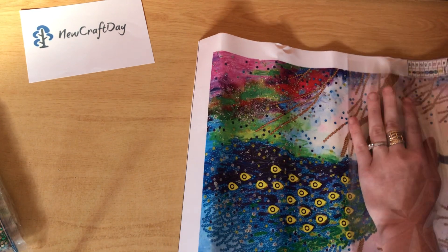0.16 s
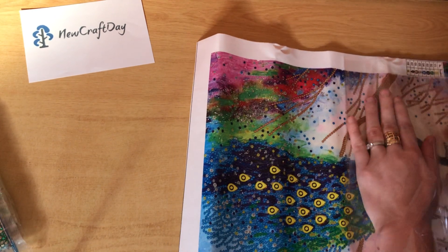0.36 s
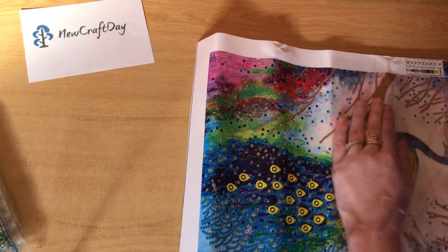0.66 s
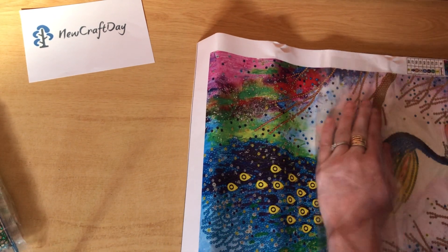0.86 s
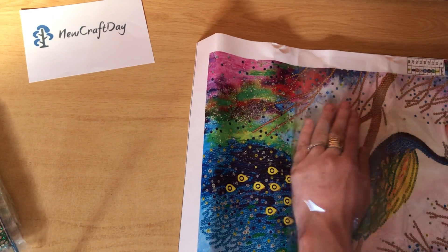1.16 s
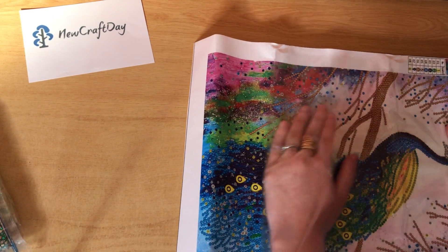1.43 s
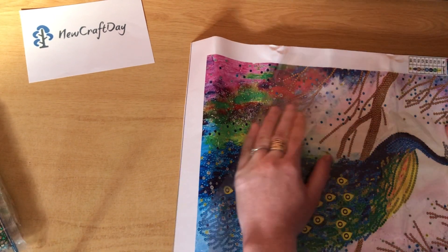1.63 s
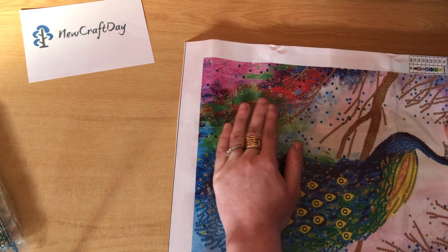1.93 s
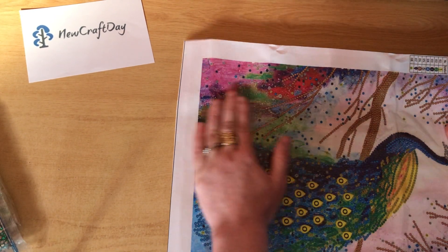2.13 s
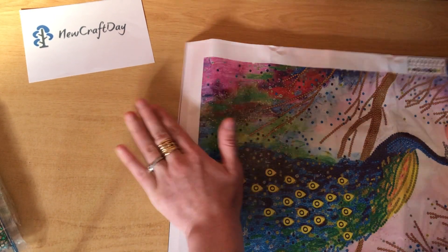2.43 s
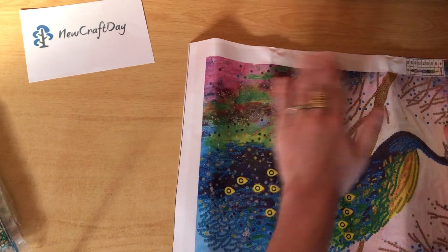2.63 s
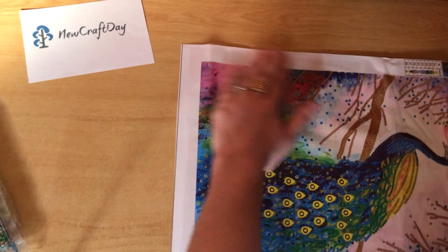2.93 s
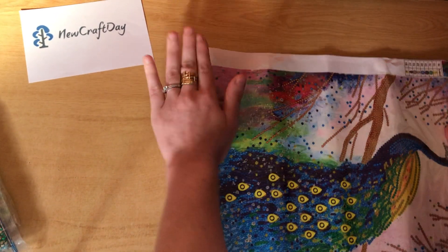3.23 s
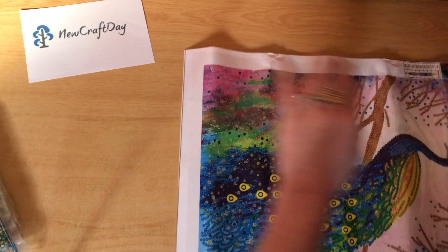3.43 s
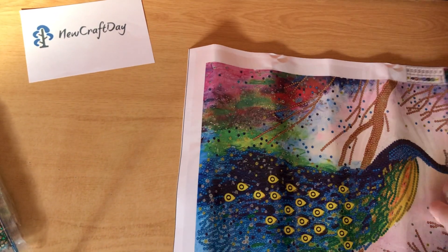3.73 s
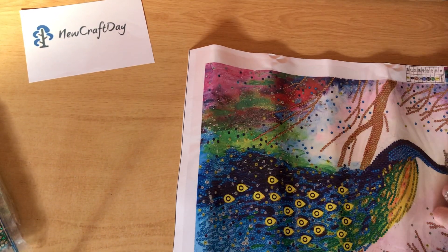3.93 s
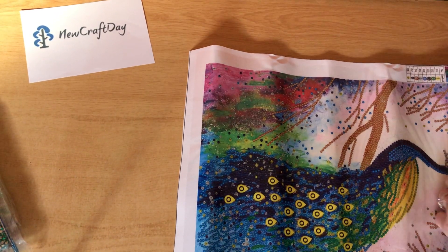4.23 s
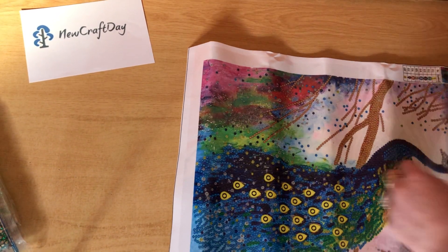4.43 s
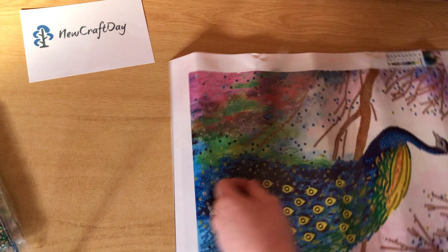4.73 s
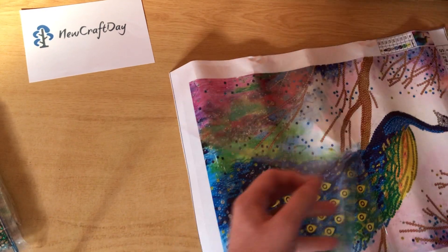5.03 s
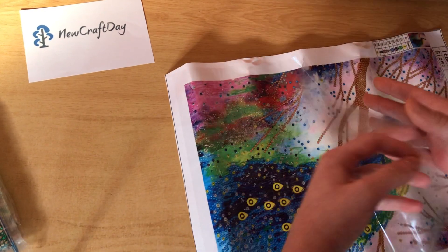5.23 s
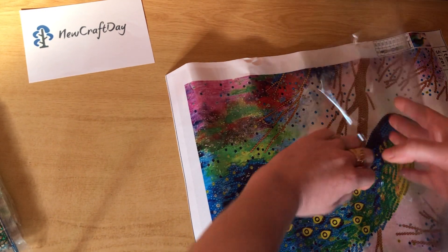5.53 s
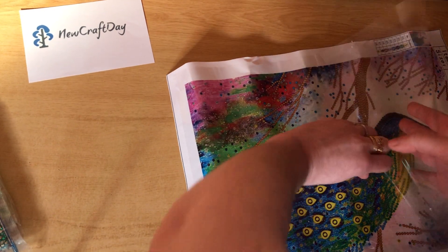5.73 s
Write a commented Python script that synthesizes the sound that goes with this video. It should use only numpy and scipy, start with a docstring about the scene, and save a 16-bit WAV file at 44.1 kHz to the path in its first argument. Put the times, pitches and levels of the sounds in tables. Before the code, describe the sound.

A thin plastic film crackles close by as hands smooth it over a canvas on a wooden table. From the start to about 1.9 seconds, swishing strokes carry many sharp, bright snaps, strongest around 0.9 and 1.7 seconds, with a soft palm bump near 1 second. From 2 seconds it is quieter: faint sliding, brief rubs of skin on plastic and scattered ticks. A dull palm thump sounds on the table at about 2.8 seconds, followed by a low rubbing slide and lighter bumps with crackles near 3.4 and 3.8 seconds. At about 4.4 seconds the film is lifted in the loudest, densest shower of crinkling, lasting until about 4.9. More crackling comes between 5 and 5.6 seconds, with a light knock near 5.3, then it thins out. The room is small, with a faint steady rumble and hiss.

```python
"""A thin plastic film crackles as hands smooth it over a canvas on a wooden table, then lift it.
Its creases buckle and snap over, singly and in showers, above the hiss of sliding and the canvas's drag.
Skin slips on the film in narrow-band rubs; a palm slides, lands and thumps, driving the table's modes.
A small room reverberates over a quiet rumble and hiss."""
import sys
import numpy as np
from scipy import signal
from scipy.fft import rfft, irfft, next_fast_len
from scipy.io import wavfile
from scipy.ndimage import uniform_filter1d, map_coordinates

SR = 44100
rng = np.random.default_rng(int(sys.argv[2]) if len(sys.argv) > 2 else 0)


def unload_wav(signal):
    """Save mono or channel-first audio to the path in sys.argv[1] as 16-bit WAV at rate SR, clipped to [-1, 1]."""
    wavfile.write(
        sys.argv[1],
        SR,
        np.round(np.clip(np.atleast_2d(signal).T, -1, 1) * 32767).astype(np.int16),
    )


N = 258850

# Strength of the film's rustle under the hand: time_s, body_db
RUSTLE_LEVEL = [(0, -56), (.2, -53), (.38, -43), (.53, -53), (.63, -44), (.78, -52.5), (.95, -45.5),
                (1.1, -54.5), (1.33, -56.5), (1.52, -44), (1.63, -49), (1.74, -39.5), (1.92, -56),
                (2.07, -66.5), (2.17, -58.5), (2.34, -70), (2.5, -56), (2.76, -74.5), (2.87, -55),
                (3.15, -58), (3.33, -65.5), (3.44, -49), (3.51, -52.5), (3.55, -59.5), (3.7, -71),
                (3.8, -61.5), (3.98, -68.5), (4.24, -55.5), (4.34, -58), (4.52, -34.5), (4.69, -40.5),
                (4.72, -33.5), (4.8, -38), (4.88, -46.5), (5.13, -54), (5.23, -40), (5.5, -50.5),
                (5.6, -41.5), (5.74, -57), (5.87, -61.5)]
# Slow drift of the rustle's colour: time_s, treble_over_body_db, canvas_drag_db
RUSTLE_COLOUR = [(0, -18, -57), (.5, -13, -63), (.9, -6, -77), (1.1, -7, -57), (1.45, -2, -62.5),
                 (1.76, -10.5, -53.5), (2.1, -1, -63.5), (2.35, 1, -66.5), (2.9, 0.5, -63.5),
                 (3.35, -2, -66), (3.75, -1, -62.5), (4.3, -1.5, -68.5), (4.48, 0, -47.5),
                 (4.75, -1.5, -62.5), (5.05, -9, -60), (5.3, -5.5, -55), (5.7, -27, -60.5),
                 (5.87, -10, -61)]
# The hand's weight landing on the table: start_s, peak_db, hardness (0 to 1)
PALM_THUMPS = [(0.341, -55, 0.5), (0.639, -66, 0.15), (0.977, -42.5, 0.2), (1.166, -56, 0.8),
               (1.685, -49, 0.3), (2.788, -30, 0.29), (3.436, -41.5, 0.55), (3.467, -46.5, 0.3),
               (3.793, -41, 0.65), (4.432, -42, 0.8), (5.278, -41, 0.7)]


def amp(db):
    """Amplitude ratio of a level in decibels."""
    return 10 ** (np.asarray(db) / 20)


def unit(x):
    """The signal normalised to rms 1."""
    return x / np.sqrt(np.mean(x ** 2) + 1e-20)


def along(points, hz):
    """Interpolation of (frequency_hz, value) points on a logarithmic frequency axis."""
    knot_hz, values = np.transpose(points)
    return np.interp(np.log(hz + 1), np.log(knot_hz + 1), values)


def curves(rows):
    """Piecewise linear envelopes, one for each column after time_s."""
    time_s, *columns = np.transpose(rows)
    return [np.interp(np.arange(N) / SR, time_s, column) for column in columns]


def wobble(knots_per_s):
    """Smooth random modulation: a spline through Gaussian values."""
    knots = rng.standard_normal(int(N * knots_per_s / SR) + 4)
    return map_coordinates(knots, [np.arange(N) * knots_per_s / SR])


def filtered(x, response):
    """Linear filtering: the spectrum is multiplied by a frequency response."""
    size = 2 * next_fast_len(N // 2 + SR // 4)
    return irfft(rfft(x, size) * response(np.fft.rfftfreq(size, 1 / SR)), size)[..., :N]


def minimum_phase(points, hz):
    """Folding the cepstrum gives a (frequency_hz, level_db) spectrum a causal response of mean power 1."""
    cepstrum = irfft(np.log(amp(along(points, hz)) + 1e-6))
    half = len(cepstrum) // 2
    cepstrum[1:half] *= 2
    cepstrum[half + 1:] = 0
    gain = np.exp(rfft(cepstrum))
    return gain / np.sqrt(np.mean(np.abs(gain) ** 2))


def film_bands(hz):
    """The film's radiation spectrum, divided by a crossover into body and treble, each of mean power 1."""
    # Spectral density of the film's sound: frequency_hz, level_db
    film_spectrum = [(410, -25.5), (700, -20), (1150, -13), (1900, -11), (3900, -5.5), (6100, -4),
                     (9000, -2.5), (12500, -4.5), (16000, -6)]
    crossover_hz = 6000
    lowpass = 1 / (1 + (hz / crossover_hz) ** 4)
    bands = minimum_phase(film_spectrum, hz) * [lowpass, 1 - lowpass]
    return bands / np.sqrt(np.mean(np.abs(bands) ** 2, axis=1, keepdims=True))


def shower(cracks_per_s, spread_db, life_s):
    """Shot noise: tiny cracks of unequal size arrive at random, their energy decaying exponentially."""
    arrivals = rng.random(N) < cracks_per_s / SR
    sizes = amp(spread_db * np.minimum(rng.exponential(size=N), 2.5))
    energy = signal.lfilter([1], [1, -np.exp(-1 / (life_s * SR))], (arrivals * sizes) ** 2)
    return np.sqrt(energy / cracks_per_s) * rng.standard_normal(N)


def film_rustle():
    """Small creases buckle in clumps over the smooth hiss of sliding friction."""
    body_db, = curves(RUSTLE_LEVEL)
    treble_db, _ = curves(RUSTLE_COLOUR)
    clumps = amp(1.8 * wobble(45))
    cracks_per_s = np.clip(500 * amp(1.3 * (body_db + 52.5)), 150, 4000)  # louder strokes are denser
    crackle = unit(clumps * shower(cracks_per_s, spread_db=2.5, life_s=0.001))
    hiss = 0.89 * rng.standard_normal(N)
    body, treble = filtered(crackle + hiss, film_bands)
    body = filtered(body, lambda hz: (1j * hz / (1j * hz + 1200)) ** 2)  # tiny creases radiate little bass
    return amp(body_db) * unit(body) + amp(body_db + treble_db) * unit(treble)


def canvas_drag():
    """Friction of the dragging canvas makes uneven mid-band noise."""
    # Spectral density of the drag: frequency_hz, level_db
    canvas_spectrum = [(200, -15.5), (400, -8.5), (700, -7.5), (1100, -3), (1700, -4), (2500, -6),
                       (5000, -47)]
    _, drag_db = curves(RUSTLE_COLOUR)
    friction = amp(2.5 * wobble(40)) * rng.standard_normal(N)
    return amp(drag_db) * unit(filtered(friction, lambda hz: minimum_phase(canvas_spectrum, hz)))


def skin_rubs():
    """Uneven frictional slips, about a hundred a second, drive one resonance for each rub."""
    # Skin slipping on the film: start_s, length_s, pitch_hz, width_hz, level_db
    rubs = [(0, 0.055, 517, 120, -62.5), (2.019, 0.044, 1100, 90, -60), (2.195, 0.068, 1020, 250, -59),
            (4.211, .02, 1190, 300, -48.5), (0.357, 0.029, 1140, 200, -60), (2.407, 0.032, 620, 400, -52.5),
            (2.78, 0.009, 2060, 1510, -35.5), (2.467, 0.038, 1730, 900, -50),
            (2.882, 0.061, 1570, 650, -52.5), (2.955, 0.17, 1800, 500, -60), (3.006, 0.095, 790, 220, -63),
            (3.552, 0.23, 374, 40, -63)]
    out = np.zeros(N + SR)
    for start_s, length_s, pitch_hz, width_hz, level_db in rubs:
        n = round(length_s * SR)
        slips = amp(3.5 * wobble(200)[:n]) * rng.standard_normal(N)[:n]
        b, a = signal.iirpeak(pitch_hz, pitch_hz / width_hz, SR)
        rub = signal.lfilter(b, a, signal.lfilter(b, a, slips))  # two passes narrow the band further
        out[round(start_s * SR):][:n] += amp(level_db) * np.sqrt(np.hanning(n)) * unit(rub)
    return out[:N]


def table_response(hz):
    """Modal superposition: the table top responds as damped resonators of alternating sign."""
    # Modes of the wooden top: pitch_hz, width_hz, level_db
    modes = [(68, 24.3, -3), (160.4, 11, 0), (213.5, 21.5, -5.5), (279, 33, -5), (370, 48, -7),
             (584, 64, -11.5), (690, 51, -9.5), (910, 116, -15)]
    return sum((-1) ** k * amp(db) * 1j * hz * width / (pitch ** 2 - hz ** 2 + 1j * hz * width)
               for k, (pitch, width, db) in enumerate(modes))


def table_shudder():
    """Forced vibration of the top: the powers fed in by resting, sliding and settling hands add."""
    # The palm pressing along the table: start_s, length_s, deep_db, board_db
    slides = [(.55, 0.26, -62, -85), (1.074, 0.19, -75, -56), (1.605, 0.29, -66, -61),
              (2.23, .42, -60.5, -63.5), (2.79, 0.37, -54.5, -73), (4.38, 0.26, -64, -58)]
    rest_deep_db, rest_board_db = -68, -67.5
    settle_db, settle_s = -14, 0.04  # after a thump: level relative to its peak, decay time
    power = np.outer(amp([rest_deep_db, rest_board_db]) ** 2, np.ones(N + SR))
    for start_s, length_s, deep_db, board_db in slides:
        n = round(length_s * SR)
        power[:, round(start_s * SR):][:, :n] += np.outer(amp([deep_db, board_db]) ** 2, np.hanning(n))
    settling = np.exp(-np.arange(SR // 2) / (settle_s * SR))
    for start_s, peak_db, _ in PALM_THUMPS:
        power[1, round(start_s * SR):][:len(settling)] += (amp(peak_db + settle_db) * settling) ** 2
    deep_gain, board_gain = np.sqrt(power[:, :N])
    vibration = filtered(rng.standard_normal(N), table_response)
    deep = filtered(vibration, lambda hz: 1 / (1 + (hz / 115) ** 6))
    return deep_gain * unit(deep) + board_gain * unit(vibration - deep)


def ambient_noise():
    """Stationary coloured noise: a quiet rumble and a faint high hiss."""
    # Spectral density of the background: frequency_hz, level_db
    air_spectrum = [(20, 17.5), (70, -10), (160, -2), (400, -14.5), (1000, -43), (2000, -22), (8000, -72),
                    (16000, -23)]
    return amp(-62.5) * unit(filtered(rng.standard_normal(N), lambda hz: amp(along(air_spectrum, hz))))


def lesser_snap_rows(count):
    """Lesser creases buckle at random times, scattered log-normally above the rustle's level and colour."""
    position = rng.random(count)
    size, tone, life = rng.standard_normal((count, 3)).T
    start_s = position * (N - 1) / SR
    at_start = lambda rows: np.interp(start_s, *np.transpose(rows)[:2])
    peak_db = at_start(RUSTLE_LEVEL) + 2.5 + 6 * size
    treble_db = at_start(RUSTLE_COLOUR) + 10 + 4 * tone
    life_ms = 1.8 * np.exp(0.35 * life)
    return np.c_[start_s, peak_db, treble_db, life_ms]


def crease_snaps():
    """Snap-through buckling: a crease flips in a run of cracks that builds and dies in milliseconds."""
    # The loudest creases snapping over: start_s, peak_db, treble_over_body_db, life_ms
    loud_snaps = [(0.0323, -39.5, -5, 6.5), (0.169, -39.5, -23, 4.7), (0.21, -31, -5, 7.5),
                  (0.2593, -38, -12, 1.8), (0.3047, -39, -5, 5), (0.3483, -25, -3, 2.7),
                  (0.3737, -30, -4, 13), (0.5163, -36.5, -13, 1.2), (0.5522, -27.5, -2, 1.5),
                  (0.5966, -24.5, 0, 0.68), (0.6076, -30.5, -2, 1.7), (0.6294, -24, -2.5, 1.8),
                  (0.6694, -33.5, 0, 1.7), (0.7514, -27.5, 1.5, 2), (0.7743, -23.5, 15, 1),
                  (0.806, -30, 6, 1.5), (0.8139, -37, 10, 1.4), (0.8301, -26.5, 6, 3),
                  (0.8436, -38, 9, 0.6), (0.8534, -30.5, 1, 1.7), (0.868, -19, 10, 1.8),
                  (0.8925, -31.5, 5, 3.0), (0.9374, -18, 10.5, 3.5), (0.9668, -29.5, 5, 2.4),
                  (1.0102, -33.5, -7, 2.5), (1.0217, -31.5, -10, 4.4), (1.0371, -37, 8, 0.47),
                  (1.0732, -26, 5, 1.5), (1.2332, -31.5, 4.5, 2.6), (1.2894, -41, -2, 3.3),
                  (1.3454, -24, 10, 2.35), (1.3715, -37, -1, 1.3), (1.4138, -36.5, 2, 2.3),
                  (1.4391, -29, 1, 0.4), (1.4648, -24.5, 9.5, 3.1), (1.4806, -28.5, -2, 2.3),
                  (1.4906, -28, 6, 1.4), (1.511, -27, -1, 1.8), (1.5443, -26.5, 5, 3.4),
                  (1.5961, -26, 7, 1.1), (1.6083, -33, -6, 3.6), (1.6982, -21.5, 6, 1.5),
                  (1.7228, -20.5, 11.5, 2.1), (1.745, -16, 16, 0.9), (1.7664, -26.5, 2, 1.74),
                  (1.7995, -27, 7, 0.69), (1.8338, -33, 2, 0.78), (1.888, -46, 8, 2.2),
                  (1.9107, -41, 16, 0.78), (2.1139, -48, 5, 2), (2.1393, -40.5, 18, 1.1),
                  (2.1667, -47, 7, 1.2), (2.203, -44, 4, 1.6), (2.213, -40.5, 6, 0.93),
                  (2.2524, -49.5, 4, 1.1), (2.345, -50, 5, 1.8), (2.418, -47, 6, 2.4),
                  (2.4673, -32.5, 5.5, 0.9), (2.481, -39, 11, 1), (2.5214, -44, 12, 2.5),
                  (2.554, -44, -4, 2), (2.603, -41, -1, 0.97), (2.7833, -35.5, 21, 6.3),
                  (2.7878, -31, -29, 1.3), (2.811, -40, -4, 1.6), (3.1377, -43, -2, 0.9),
                  (3.2178, -42.5, -11, 1.2), (3.283, -48.5, -8, 3.6), (3.3551, -36.5, 4.5, 1.1),
                  (3.3693, -38, 12, 0.51), (3.44, -34.5, 2, 1.2), (3.4535, -27, 5, 0.47),
                  (3.4858, -29, 9, 1.8), (3.5625, -51, -15, 1.5), (3.6685, -48.5, 6, 1.9),
                  (3.758, -46.5, -7, 2.8), (3.7821, -36.5, -4, 1.2), (3.789, -37.5, 8, 2.1),
                  (3.9316, -52, -1, 0.95), (4.0465, -27.5, 10, 0.72), (4.0944, -42, 6, 1.1),
                  (4.1352, -40, 8, 4.5), (4.2054, -42, -3, 1.5), (4.2207, -30.5, -0.5, 2.6),
                  (4.2805, -43, 12, 1.3), (4.3037, -42.5, 1, 1.9), (4.33, -36, -3, 2.7),
                  (4.3463, -37.5, -4, 2.3), (4.379, -38, 9, 1.3), (4.391, -32, 3, 1.3),
                  (4.41, -32.5, -2, 6.4), (4.4314, -23.5, -6, 1.63), (4.4388, -22.5, 7, 1.2),
                  (4.4505, -26.5, 5, 1.9), (4.4662, -20, 6.5, 0.73), (4.4748, -27, 8, 0.88),
                  (4.4838, -27, 2, 0.8), (4.505, -21, 21, 2.2), (4.5146, -21.5, 3.5, 0.57),
                  (4.7049, -18.5, 2, 0.58), (4.8917, -38, 5, 2.1), (4.9094, -36, -3, 0.7),
                  (4.9418, -34.5, -1, 1.3), (4.9923, -25.5, 5.5, 1.75), (5.0091, -30, 6, 1),
                  (5.0623, -37.5, -10, 1.5), (5.0824, -45, 8, 2), (5.1443, -25.5, 4, 5.1),
                  (5.1818, -30, -3, 0.3), (5.2001, -26.5, 1, 4.1), (5.2164, -26, -1, 2.7),
                  (5.2395, -32.5, -2, 2), (5.2655, -38, 9, 3.0), (5.2816, -23, 1.5, 4.2),
                  (5.3039, -28, -3, 4.1), (5.3493, -33, 2, 2.8), (5.4342, -37, -9, 5.8),
                  (5.4877, -38.5, 16, 1.8), (5.516, -46, 10, 1.5), (5.53, -30.5, 7, 1.4),
                  (5.5404, -32.5, -1.5, 7.5), (5.6614, -46, 6, 1.5), (5.6792, -39, -1, 1.6),
                  (5.717, -34.5, -10, 0.91)]
    start_s, peak_db, treble_db, life_ms = np.r_[loud_snaps, lesser_snap_rows(count=70)].T
    t = np.arange(1536) / SR
    life_s = np.clip(life_ms, 0.3, 8)[:, None] / 1000
    noise = rng.standard_normal((len(start_s), 2, len(t)))
    spike_db = 3.9 * np.sqrt(5) * uniform_filter1d(noise[:, 1], size=5, axis=1)
    attack = 1 - np.exp(-t / (0.16 * life_s))
    decay = np.exp(-(t / (1.34 * life_s)) ** 1.08) + 0.092 * np.exp(-t / 0.044)
    runs = noise[:, 0] * amp(spike_db) * attack * decay
    runs /= np.sqrt(uniform_filter1d(runs ** 2, size=44, axis=1).max(1, keepdims=True))  # loudest 1 ms
    samples = (np.round(start_s * SR).astype(int)[:, None] + np.arange(len(t))).ravel()
    place = lambda gain: np.bincount(samples, (runs * gain[:, None]).ravel(), N + len(t))[:N]
    body_gain = amp(peak_db) / np.sqrt(1 + amp(2 * treble_db))  # body and treble share the peak power
    body, treble = filtered(np.array([place(body_gain), place(body_gain * amp(treble_db))]), film_bands)
    return body + treble


def palm_thumps():
    """Impact excitation: a force pulse rings the table's modes; harder contact makes a shorter pulse."""
    softest_contact_s, edge_db = 0.0067, 23.5
    out = np.zeros(N + SR)
    impulse_response = filtered(signal.unit_impulse(N), table_response)[:SR // 2]
    for start_s, peak_db, hardness in PALM_THUMPS:
        force = np.hanning(round(SR * softest_contact_s / (1 + 4 * hardness)) + 3)
        force[0] = amp(edge_db)  # the sharp first touch stands above the pulse's crest
        thump = signal.fftconvolve(impulse_response, force)
        out[round(start_s * SR):][:len(thump)] += amp(peak_db) * thump / np.abs(thump).max()
    return out[:N]


def reverberation(x):
    """A diffuse field: each frequency decays at its own rate, with a fresh noise tail every quarter second."""
    # Reverberation time of the small room: frequency_hz, t60_s
    decay_times = [(150, 0.11), (1300, 0.37), (4000, 0.096), (9000, 0.06), (16000, 0.02)]
    hop, delay_samples = SR // 4, 130
    out = np.zeros(N + 2 * SR)
    for start in range(0, N, hop):
        hz, t, spectrum = signal.stft(rng.standard_normal(SR // 2), SR, nperseg=256)
        decay = amp(-60 * t / along(decay_times, hz)[:, None])
        _, tail = signal.istft(spectrum * decay, SR, nperseg=256)
        wet = signal.fftconvolve(x[start:start + hop], tail / np.linalg.norm(tail))
        out[start + delay_samples:][:len(wet)] += wet
    return out[:N]


def scene():
    """Superposition of all sources; only the snaps and thumps excite the room."""
    transients = crease_snaps() + palm_thumps()
    sustained = table_shudder() + ambient_noise() + film_rustle() + canvas_drag() + skin_rubs()
    return (transients + sustained + amp(-11) * reverberation(transients))[None]


def record(dry):
    """Band limiting: the sound loses its deepest bass, has a few narrow dips and ends steeply near 16 kHz."""
    # Narrow dips in the spectrum: centre_hz, half_width_hz, depth_db
    notches = [(4900, 300, 4), (7800, 400, 3.5), (10400, 350, 4)]
    bass_hz, limit_hz = 38, 16900
    bass = lambda hz: (1j * hz / (1j * hz + bass_hz)) ** 3
    dips = lambda hz: amp(-sum(db * np.exp(-((hz - centre) / width) ** 2) for centre, width, db in notches))
    top = lambda hz: (hz < limit_hz) * amp(np.interp(hz, [15700, 15950, limit_hz], [0, -28, -50]))
    return filtered(dry, lambda hz: bass(hz) * dips(hz) * top(hz))


dry = scene()
out = record(dry)
unload_wav(out)
```